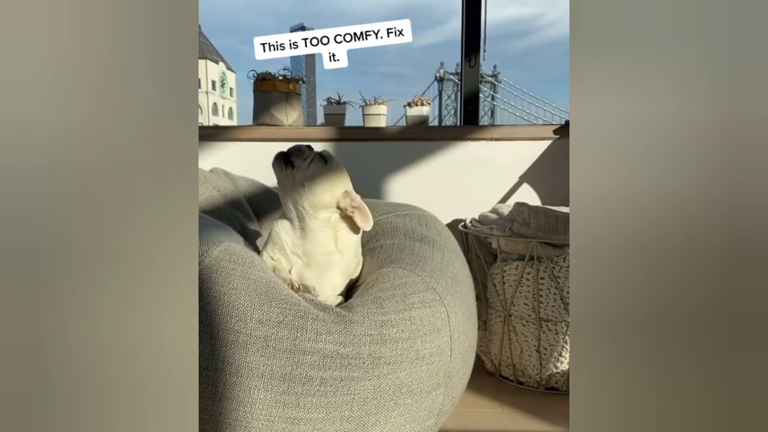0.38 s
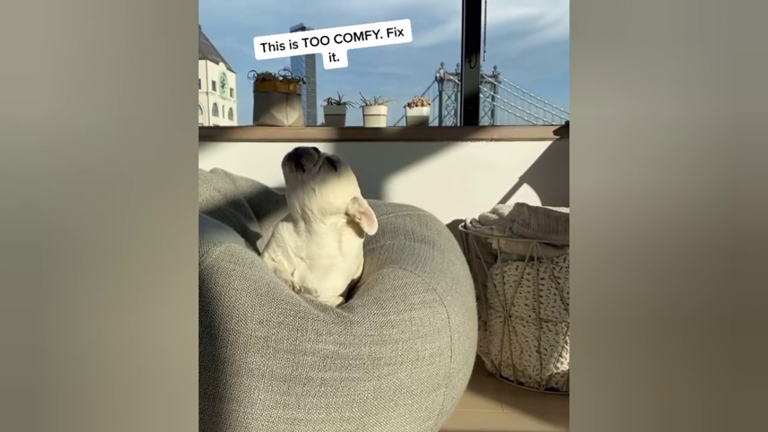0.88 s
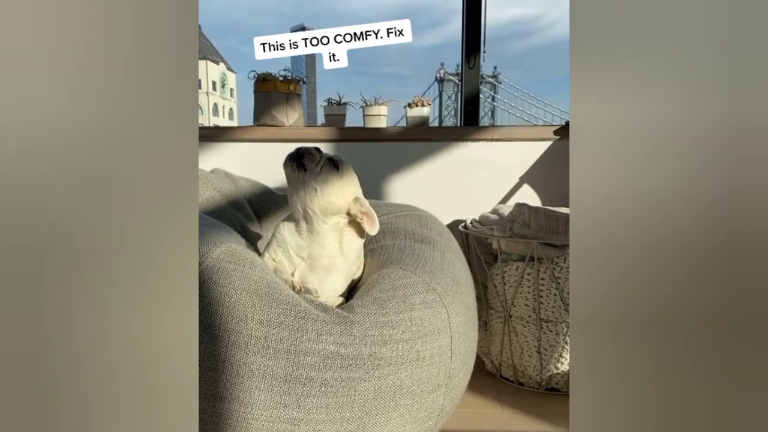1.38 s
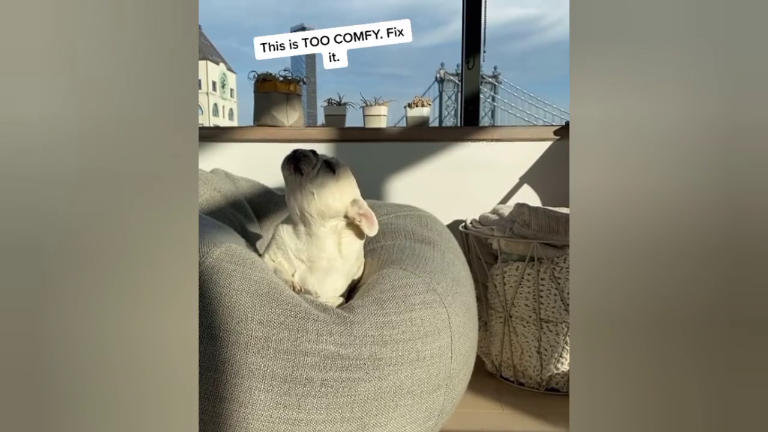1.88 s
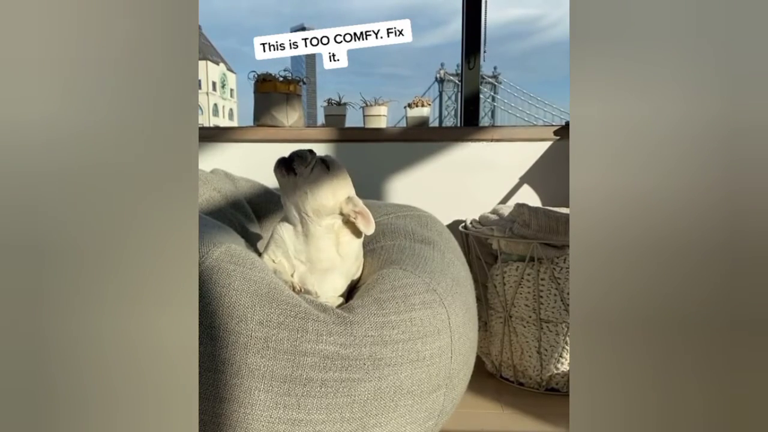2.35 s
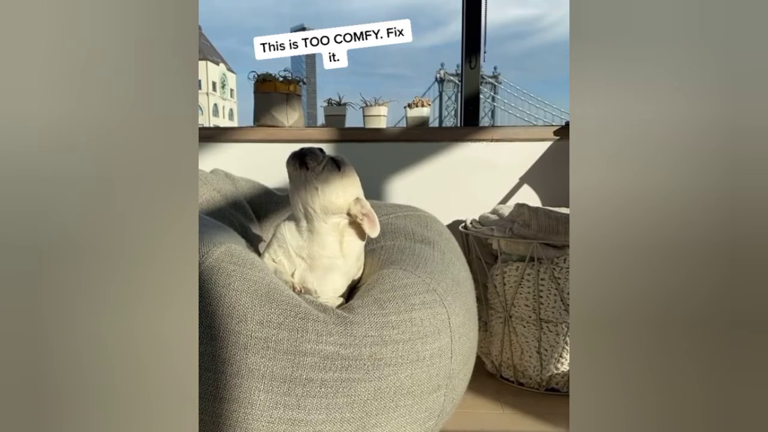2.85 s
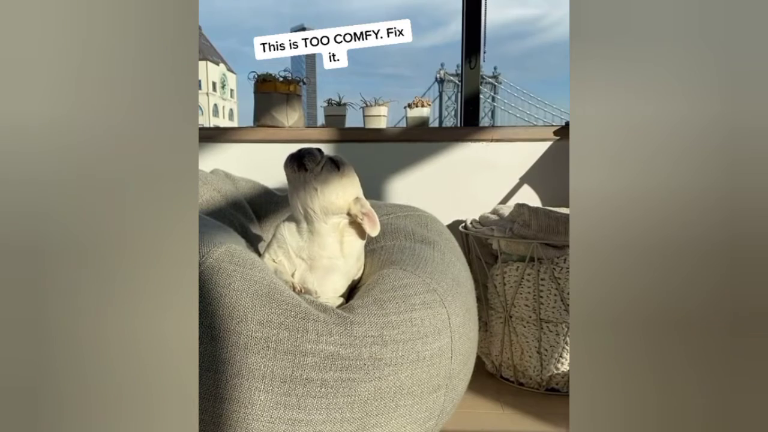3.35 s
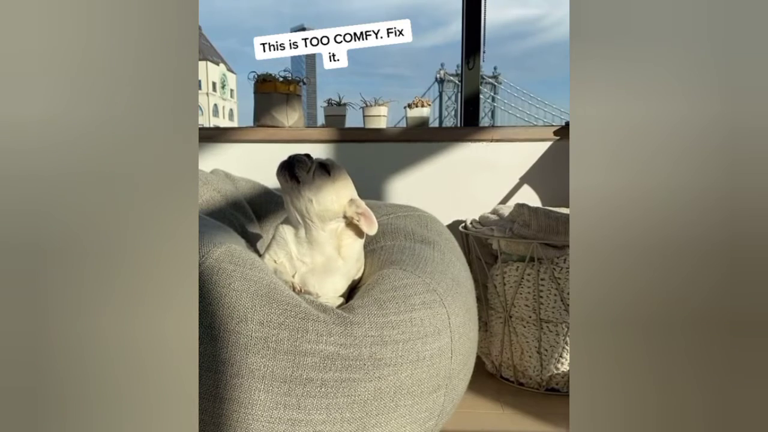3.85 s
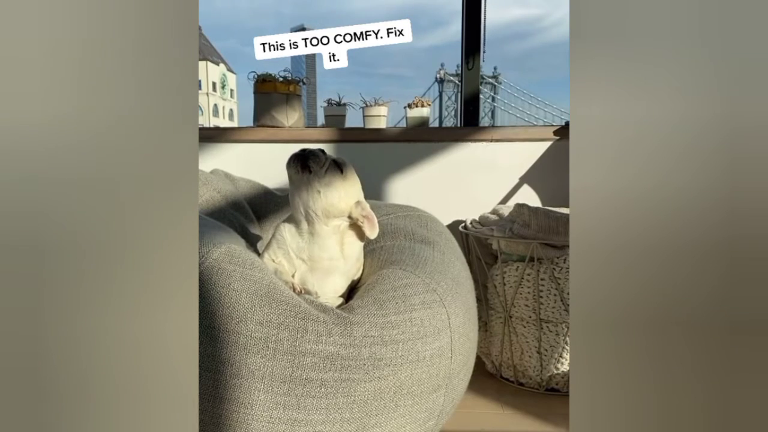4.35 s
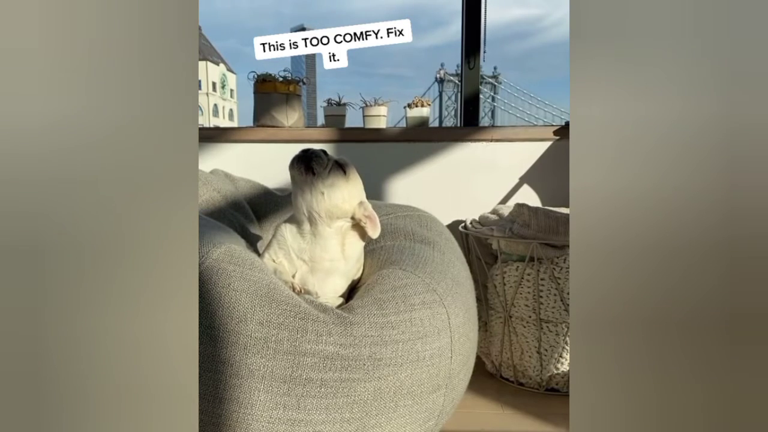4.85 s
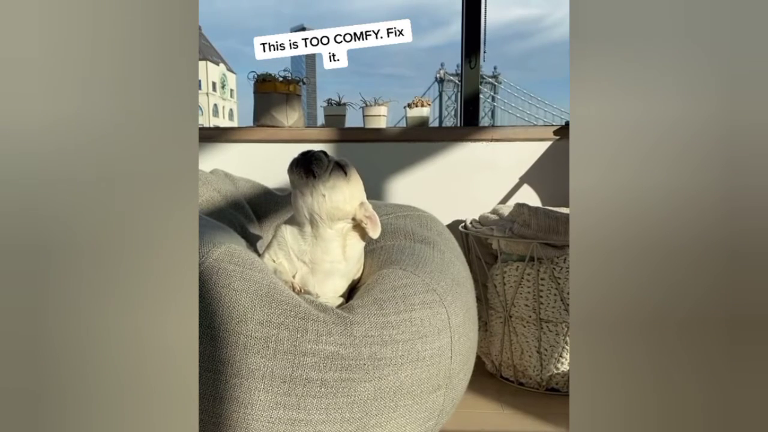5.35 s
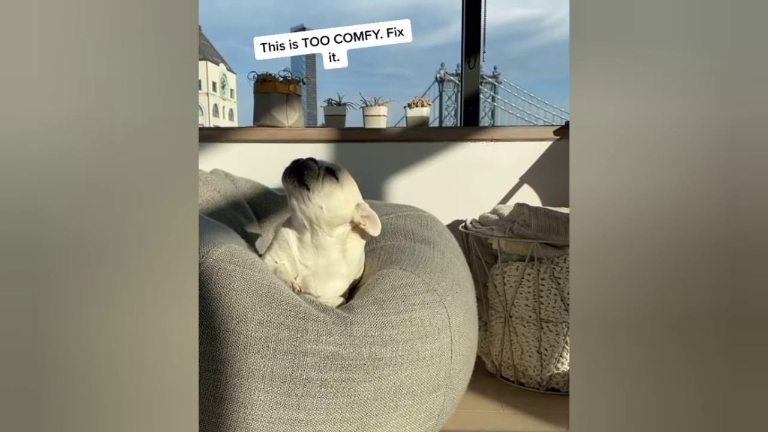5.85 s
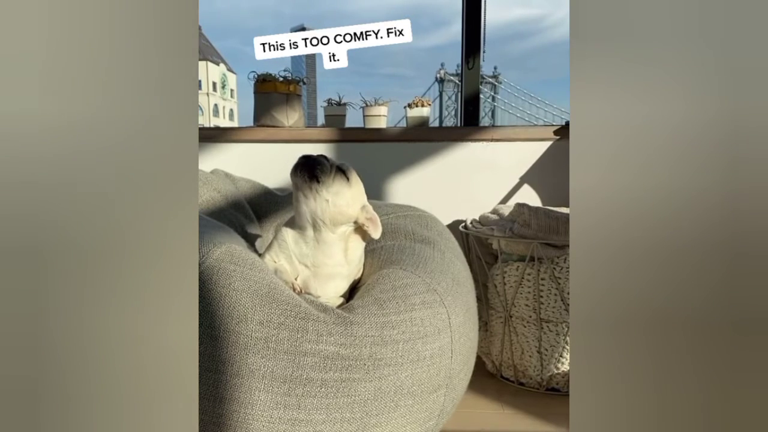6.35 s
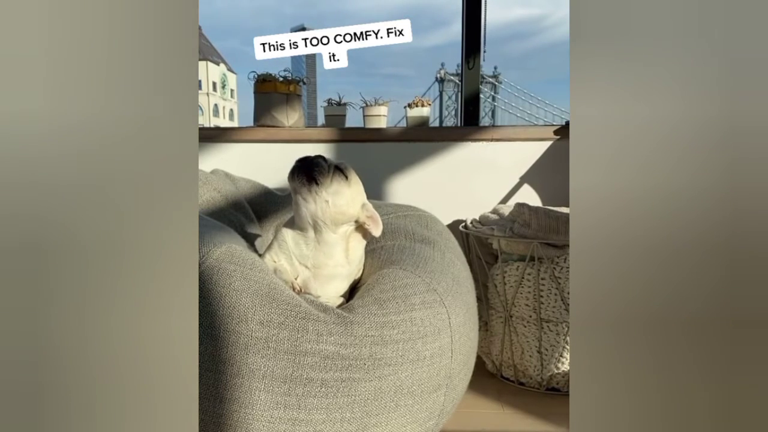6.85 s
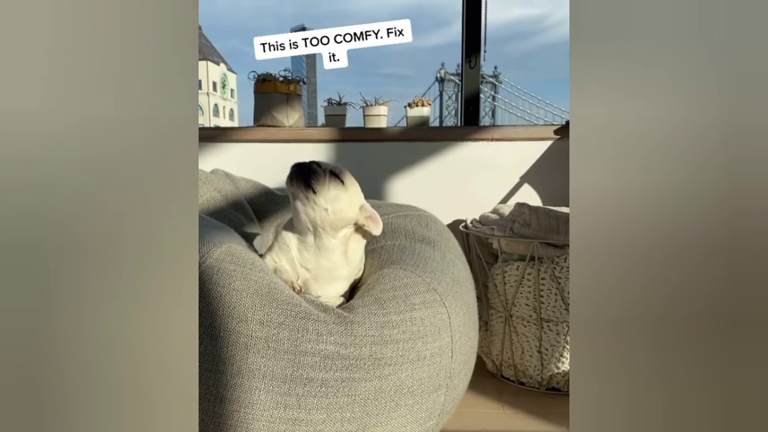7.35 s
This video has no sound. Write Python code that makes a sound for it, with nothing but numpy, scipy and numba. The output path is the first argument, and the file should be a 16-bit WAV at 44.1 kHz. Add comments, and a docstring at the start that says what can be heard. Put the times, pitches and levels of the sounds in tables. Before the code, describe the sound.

Four short nasal sniffs each lead to a sharp raspy bark and a drawn-out quavering dog howl, close indoors, over very quiet low hum.

```python
"""Indoors, a low city hum lies under the whole take, coming through the window with a faint mains tone.
Four times, a small flat-faced dog on a cushion sniffs in, barks, and lets the bark run into a wavering yowl.
The sniffs are noise through nostril resonances. In the howls a near-pure fold tone is fluttered by loose
throat tissue, and breath rasps through throat, mouth and short snout.
After each sound the furnished room leaves a short tail; a phone with two ports picks it all up in stereo."""
import sys
import numpy as np
from scipy import signal
from scipy.fft import rfft, irfft, next_fast_len
from scipy.io import wavfile
from scipy.ndimage import uniform_filter1d
from numba import njit

SR = 44100
rng = np.random.default_rng(int(sys.argv[2]) if len(sys.argv) > 2 else 0)


def inscribe(sig):
    """Save sig as 16-bit PCM at rate SR to the path in sys.argv[1].

    A 1-D sig is mono; a 2-D sig holds one channel per row.
    Samples are clipped to [-1, 1] before scaling.
    """
    pcm = np.round(np.clip(np.atleast_2d(sig).T, -1, 1) * 32767)
    wavfile.write(sys.argv[1], SR, pcm.astype(np.int16))


def natural_amplitude(level_db):
    """Convert a level in decibels to a linear amplitude factor, elementwise."""
    exponent = np.asarray(level_db, float) / 20
    return 10 ** exponent


N = 329427
T = np.arange(N) / SR  # seconds

# City hum through the window. Each row: frequency in Hz, relative density in dB per Hz.
HUM = [(18, -31), (30, -9.5), (71, -2.5), (186, -4), (307, -17.5), (624, -24), (1520, -33.5), (2140, -62.5),
       (2880, -39.5), (3220, -62), (3530, -41), (7000, -62), (9100, -95.5), (15400, -120)]
HUM_DB, MAINS_HZ = -58, 60
# Room tail in bands. Each row: centre in Hz, decay time in s, relative level in dB,
# share that differs between the ports.
ROOM = [(436, 0.31, -4.5, 0.19), (695, 0.62, -13, 0.15), (1610, 0.72, -8.5, 0.5), (3456, 0.25, -6, 0.74),
        (7400, 0.12, -9.5, 0.68)]
# How the two microphone ports hear the dog. Each row: frequency in Hz, left minus right in dB,
# lead of the left in radians.
PORTS = [(100, 0, 0), (360, -.5, 0), (520, -6, 0), (920, -6, 0), (1200, 1, 0), (1800, .5, .1),
         (2600, .5, .7), (4200, -1, 1.2), (6200, 0, 2), (7700, 0, 3), (9500, 0, 2.9), (12000, 0, 2.2)]

# Breaths drawn in through the nose. Each row: start in s, end in s, level in dB.
SNIFFS = [(0, 0.24, -66), (2.094, 2.257, -66.5), (3.813, 3.991, -66), (5.782, 5.99, -65.5)]
# Resonances of the nostrils in a sniff. Each row: centre in Hz, width in Hz, relative level in dB.
NOSTRILS = [(834, 160, -4), (1330, 1100, -1.5), (2700, 200, -15.5), (5200, 1200, -11.5), (6960, 870, -9.5)]
# Snout resonances above the mouth's own. Each row: centre in Hz, width in Hz, relative level in dB.
SNOUT = [(2830, 400, -7.5), (3600, 950, 2), (3980, 230, 3), (4400, 210, 2)]
# Resonances of the nose. Each row: centre in Hz, width in Hz, relative level in dB.
NOSE = [(5720, 710, -4), (6410, 300, -4.5), (7004, 1000, -1), (7580, 450, -8), (11430, 870, -22),
        (12900, 600, -16)]

# The bark that opens each howl. Each row: breath burst in s, delay until the folds catch in s,
# hold from the catch in s, level in dB, extra breath in dB.
BARKS = [(0.226, .03, 0.11, -12, 0.5), (2.268, .034, .075, -11, 3), (3.996, .028, 0.096, -12, 2),
         (5.985, 0.03, 0.076, -13, -1)]
# Bark pitch as a share of the top pitch: at the burst, at full voice, at the end of the hold, after release.
BARK_PITCH = (.92, .97, 0.91, 0.82)
# Breath in dB at the same four moments, before the extra breath.
BARK_BREATH_DB = (33.4, 23, 13, 35)
# Mouth resonance in Hz at the same four moments.
BARK_MOUTH_HZ = (2540, 2570, 2414, 2100)
BARK_TOP_HZ = 859
BARK_BURST_S, BARK_ATTACK_S, BARK_RELEASE_S = 0.0056, 0.012, .075
# level steps: at the burst, at the end of the hold, after the release
BARK_LEAD_DB, BARK_SAG_DB, BARK_END_DB = -28.5, -8, -28.5

# The yowl after each bark, one list a howl. Each row: time in s, fold pitch in Hz, level in dB,
# breath in dB, mouth resonance in Hz.
YOWLS = [
    [(.48, 720.4, -35.5, 25, 1957), (.544, 694, -22.5, 5.5, 2010), (.63, 656.3, -32, 1, 1940),
     (.68, 554, -36, 1, 1828), (.81, 513.3, -35.5, -5, 1920), (1.05, 505.2, -33.5, -4, 1950),
     (1.21, 452, -38.5, -9.5, 1896), (1.32, 457.8, -54.5, 12, 1960), (1.38, 440.1, -50, 1, 1950),
     (1.46, 403.6, -49.5, -13, 2010), (1.5, 399.6, -46.5, -14, 2030), (1.555, 434.3, -47, 3, 2027),
     (1.572, 512, -33, 0.5, 1977), (1.618, 620.4, -29, 4, 2000), (1.7, 500.4, -40, -6.5, 2010),
     (1.8, 411, -53.5, -5.5, 2020)],
    [(2.5, 760, -27, 1.5, 2035), (2.59, 813, -19, 16, 2170), (2.625, 790, -16, 0, 2164),
     (2.76, 658, -32, 0, 2100), (2.845, 575, -29.5, -1.5, 1961), (2.95, 570, -32.5, -1.5, 1990),
     (3.04, 600, -28, 1, 2095), (3.126, 520, -34, -8, 2010), (3.25, 535, -32.5, -1.5, 1995),
     (3.326, 574, -27, 2.5, 2017), (3.43, 480, -38.5, -6.5, 1921), (3.47, 487.8, -53.5, 8, 1930)],
    [(4.25, 787.5, -30, 16.5, 1990), (4.316, 765, -18, -1.5, 2050), (4.38, 722, -17.5, 2, 2170),
     (4.5, 645, -27.5, -10.5, 2000), (4.606, 586, -29.5, -0.5, 1851), (4.712, 555, -29.5, -2.5, 2000),
     (4.8, 613.1, -27, -5.5, 2000), (4.86, 635, -23, 2.5, 2050), (5, 697.6, -20.5, 1, 2103),
     (5.09, 621, -29, 2.5, 2117), (5.17, 606.4, -31, 8, 2030), (5.244, 693.7, -19, 6, 2150),
     (5.29, 711.3, -16.5, 5, 2230), (5.366, 512.7, -40.5, 10, 2150), (5.44, 482.3, -54, 14.5, 2150)],
    [(6.24, 688, -31.5, 16, 2033), (6.31, 678, -21, 13.5, 2100), (6.43, 665, -23.5, 12.5, 2053),
     (6.49, 676, -22.5, 12.5, 2100), (6.57, 742, -12, 8, 2260), (6.65, 731.8, -19, 7.5, 2354),
     (6.71, 742, -19.5, 17, 2454), (6.76, 717.4, -15, 10, 2250), (6.85, 694, -25.5, 15, 2160),
     (6.92, 674, -22.5, 7, 2140), (7, 613, -35.5, 21, 2175), (7.1, 506.6, -34.5, 6.5, 2138),
     (7.2, 357.5, -48.5, 8, 2052), (7.24, 366.8, -49.5, -10, 2100)],
]
# How each yowl shares its rasp. Each row: throat in dB, low in dB, mouth in dB, nose in dB.
SHARES = [(7, 0.5, 1.5, -4), (3, -1, 1, 1), (-3, -1, -0.5, 6.5), (-6.5, -1, -3.5, 1.5)]
# The loose throat tissue. Each row: time in s, mean flutter rate in Hz, flutter depth before its raggedness.
FLUTTER = [(.25, 88.23, 0.52), (0.449, 84.2, 0.7), (.55, 86.95, 0.28), (.68, 93.77, .35),
           (1.049, 107.9, 0.44), (1.5, 101.4, .4), (1.62, 94.2, 0.64), (2.301, 97.25, 0.81),
           (2.5, 107.8, 0.85), (2.629, 107.9, 0.29), (2.848, 105.5, 0.76), (3.05, 109.2, 0.83),
           (3.148, 106.1, 0.81), (3.33, 109, 0.9), (4.019, 84.91, .5), (4.249, 86.66, 0.26),
           (4.378, 103.9, 0.53), (4.6, 90.15, 0.29), (4.72, 82, .45), (4.86, 81.98, .5), (4.998, 75, 0.89),
           (5.099, 76.32, 1.3), (5.198, 76.78, 0.37), (5.28, 75.62, 0.7), (6.022, 85.3, .45),
           (6.24, 72.66, 0.28), (6.308, 73.43, 0.61), (6.451, 72.68, 0.56), (6.548, 80.3, 0.47),
           (6.698, 81.06, .95), (6.781, 74.15, 0.8), (6.902, 70.7, 0.2), (6.999, 69.3, 1.2),
           (7.201, 58.95, 0.4)]
# Rough strands an octave up as the voice falls away. Each row: start in s, end in s, dB relative to the voice.
BREAKS = [(1.6, 1.74, -24), (5.29, 5.4, -22), (6.96, 7.13, -11)]

# rasp of each hollow relative to the voice: (dB at breath 0, dB per dB of breath)
THROAT_RASP, LOW_RASP, MOUTH_RASP = (-18, 0.033), (-32.5, 0.71), (-28, .55)
SNOUT_RASP, NOSE_RASP, BURST_RASP = (-39.5, 0.78), (-30.5, 0.8), (-32.5, 0.66)
BURST_HZ, BURST_WIDTH_HZ = 2000, 1100  # the torn burst of a bark
BARK_MOUTH_DB, BARK_SNOUT_DB, BARK_NOSE_DB = 1, 0.5, -2.5  # how a bark shifts the rasps
BARK_LOW_HZ, BARK_MOUTH_WIDTH_HZ = 1296, 300  # the open jaw of a bark
# the low rasp swells while the pitch drops: dB for each kHz per second, at most this much
FALL_RASP_DB, FALL_RASP_TOP_DB = 5.5, 7
# a weak yowl flutters raggedly: steadiest near the first level, fully ragged this many dB below
EVEN_DB, RAGGED_SPAN_DB = -17, 21
BARK_HOARSE, BARK_RAGGED, YOWL_HOARSE = .45, .7, .085  # shares
OVERTONE_DB, BARK_OVERTONE_DB = -35.5, -42  # relative to the voice
# folds below this pitch go slack, over this span, and their overtones hold a level of their own
SLACK_HZ, SLACK_SPAN_HZ, SLACK_OVERTONE_DB = 480, 31.5, -54.5
# the throat favours side tones near its own ring
RING_HZ, RING_WIDTH_HZ, RING_DB = 860.3, 150, -2.4
THROAT_TOP_HZ = 960
WAVER, PATCHY_DB = .009, 2.6  # spread of the slow pitch waver as a share, of the patches in a yowl's rasp


def unit(x):
    """Scale to rms 1."""
    return x / np.sqrt(np.mean(x ** 2))


@njit
def svf(x, hz, width):
    """State-variable band-pass with a moving centre, gain 1 there."""
    y, b, l = np.empty(len(x)), 0., 0.
    for i in range(len(x)):
        g, k = np.tan(np.pi * hz[i] / SR), width / hz[i]
        v = (b + g * (x[i] - l)) / (1 + g * (g + k))
        b, l, y[i] = 2 * v - b, l + 2 * g * v, k * v
    return y


def resonance(x, hz, width):
    """A steep resonance: the band-pass twice."""
    hz = np.clip(hz + np.zeros(len(x)), 20, .45 * SR)
    return svf(svf(x, hz, 1. * width), hz, 1. * width)


def walk(rate):
    """Smooth chance that changes about rate times a second; spread 1."""
    k = int(SR / rate)
    return unit(uniform_filter1d(uniform_filter1d(rng.standard_normal(N), k), k))


def shaped(x, table, gain):
    """Filter by a gain computed from columns laid on a log-frequency axis."""
    hz, *columns = np.transpose(table)
    size = next_fast_len(x.shape[-1])
    axis = np.log(np.arange(size // 2 + 1) * SR / size + 1)
    columns = [np.interp(axis, np.log(hz), c) for c in columns]
    return irfft(rfft(x, size) * gain(*columns), size)[..., :x.shape[-1]]


def hum():
    """Distant traffic and house machinery as shaped noise, nearly the same at both ports, and a mains tone."""
    shared, apart = shaped(rng.standard_normal((2, N)), HUM, lambda db: natural_amplitude(db))
    apart = resonance(apart, 2500, 1800)
    noise = unit(shared + .8 * apart * np.array([[1], [-1]]))
    mains = natural_amplitude(-61) * np.sin(2 * np.pi * MAINS_HZ * T)
    return natural_amplitude(HUM_DB) * natural_amplitude(1.0 * walk(0.81)) * noise + mains


def room(x):
    """Diffuse tail of decaying noise bands, the top dying soonest; the ports differ most in the treble."""
    t = T[:SR // 2]
    rise = 1 - np.exp(-t / 0.0034)
    tail = 0
    for hz, t60, db, spread in ROOM:
        shared, apart = (unit(resonance(rng.standard_normal(len(t)), hz, hz)) for _ in range(2))
        fade = rise * np.exp(-np.log(1000) * t / t60)
        level = natural_amplitude(db) / np.sqrt(np.sum(fade ** 2)) * np.sqrt(hz / SR * 2)
        tail = tail + level * fade * (shared + spread * apart * np.array([[1], [-1]]))
    return signal.fftconvolve(x[None], tail, axes=1)[:, :N]


def sniffs():
    """Air hissing in through narrow nostrils, swelling and fading before each call."""
    shape = 0
    for start, end, db in SNIFFS:
        progress = np.clip((T - start) / (end - start), 0, 1)
        shape = shape + natural_amplitude(db) * np.sin(np.pi * progress ** 1.2)
    air = rng.standard_normal(N)
    return shape * unit(sum(natural_amplitude(db) * resonance(air, hz, width) for hz, width, db in NOSTRILS))


def cavities(air, table):
    """Air through fixed hollows, each band of rasp swelling and fading at random, on its own."""
    drift_db, drift_rate = 4.5, 10
    return unit(sum(natural_amplitude(db + drift_db * walk(drift_rate)) * resonance(air, hz, width)
                    for hz, width, db in table))


def bark(start, lead, hold, db, extra_db):
    """Rows like a yowl's: breath first, the folds catch, pitch peaks in the hold, the mouth closes."""
    catch = start + lead
    end = catch + hold
    s = [start - BARK_BURST_S, start, catch, catch + BARK_ATTACK_S, catch + hold / 2, end, end + BARK_RELEASE_S]
    stage = [0, 0, .5, 1, 1.5, 2, 3]  # place among the four moments of the bark tables
    pitch, breath, mouth = (np.interp(stage, range(4), c) for c in (BARK_PITCH, BARK_BREATH_DB, BARK_MOUTH_HZ))
    pitch[4] = 1
    level = db + np.array([2 * BARK_LEAD_DB, BARK_LEAD_DB, BARK_LEAD_DB / 2 + 2, 0, 0, BARK_SAG_DB, BARK_END_DB])
    breath = breath + extra_db * (np.array(stage) < 3)
    return np.transpose([s, BARK_TOP_HZ * pitch, level, breath, mouth])


def controls():
    """The dog's effort over time: pitch, level, breath, mouth, the four shares, barking 0-1, sounding 0-1."""
    rows, sounding = [], 0
    for bark_row, yowl, shares in zip(BARKS, YOWLS, SHARES):
        howl = np.concatenate([bark(*bark_row), yowl])
        s = howl[:, 0]
        barking = s < yowl[0][0]
        rows.append(np.column_stack([howl, np.outer(~barking, shares), barking]))
        sounding = sounding + np.clip(np.minimum(T - s[0], s[-1] - T) / .02 + .5, 0, 1)
    s, *columns = np.concatenate(rows).T
    return [uniform_filter1d(np.interp(T, s, c), size=SR // 150) for c in columns] + [sounding]


def dog():
    """Fold tone with fluttering loudness and pitch, its overtones, and breath let through at each flutter."""
    hz, db, breath_db, mouth_hz, *shares, barking, sounding = controls()
    yowling = 1 - barking
    s, *columns = np.transpose(FLUTTER)
    rate, depth = (np.interp(T, s, c) for c in columns)

    # more breath, more rasp; it comes and goes in patches
    throat_db, low_db, mouth_db, snout_db, nose_db = (
        base + slope * breath_db for base, slope in (THROAT_RASP, LOW_RASP, MOUTH_RASP, SNOUT_RASP, NOSE_RASP))
    throat_db, low_db, mouth_db, nose_db = (
        rasp + share + PATCHY_DB * (1 - barking / 2) * walk(14)
        for rasp, share in zip((throat_db, low_db, mouth_db, nose_db), shares))
    mouth_db = mouth_db + BARK_MOUTH_DB * barking
    nose_db = nose_db + BARK_NOSE_DB * barking
    snout_db = snout_db + BARK_SNOUT_DB * barking

    falling = -uniform_filter1d(np.gradient(hz), size=SR // 20) * SR / 1000  # kHz per second
    # low folds are slack unless the pitch is dropping fast
    slack = np.clip((SLACK_HZ - hz) / SLACK_SPAN_HZ, 0, 1) * np.clip(2 - 2.5 * falling, 0, 1)
    overtone_db = db + OVERTONE_DB * yowling + BARK_OVERTONE_DB * barking
    overtone_db = overtone_db * (1 - slack) + SLACK_OVERTONE_DB * slack
    low_db = low_db + np.clip(FALL_RASP_DB * falling, 0, FALL_RASP_TOP_DB) * yowling
    throat_db, low_db = throat_db - 2.4 * slack, low_db - 12.0 * slack
    hoarse = BARK_HOARSE * barking + YOWL_HOARSE * yowling * (1 - .7 * slack)
    ragged = BARK_RAGGED * barking + np.clip((EVEN_DB - db) / RAGGED_SPAN_DB, .2, 1) * yowling

    flutter = 2 * np.pi * np.cumsum(rate * (1 + .5 * ragged * walk(50))) / SR
    depth = np.clip(depth * natural_amplitude(4.0 * ragged * walk(45)), 0, 1.6 - .9 * barking)
    # loudness and pitch rise together in each flutter, so the side tones lie above the fold pitch
    swell = np.exp(depth * np.cos(flutter)) / np.sqrt(np.i0(2 * depth))
    swell = swell * natural_amplitude(5.8 * hoarse * walk(60))
    slip = depth * np.sin(flutter)
    folds = 2 * np.pi * np.cumsum(hz * (1 + .08 * hoarse * walk(120) + WAVER * walk(18))) / SR
    tone = np.sqrt(2) * svf(swell * np.cos(folds + slip), hz + 90, 550.)
    tone = tone + natural_amplitude(RING_DB) * resonance(tone, RING_HZ, RING_WIDTH_HZ)

    # the evener the flutter, the more it takes hold of the overtones (second to fifth)
    grip = 1 - ragged
    partials = [natural_amplitude(-15.0 * np.sqrt(k) - 3 * k) * np.cos((k + 2) * (folds + .6 * grip * slip)) for k in range(4)]
    overtones = np.sqrt(2) * swell ** grip * sum(partials)
    overtones = overtones + natural_amplitude(10.5) * resonance(overtones, mouth_hz, 240)

    # the tissue slaps shut once a flutter; the hiss of breath follows the swell
    slaps = unit(np.diff(np.floor(flutter / (2 * np.pi)), prepend=0)) * depth
    breath = (.45 + .6 * swell) * rng.standard_normal((8, N)) + .55 * slaps
    throat = natural_amplitude(throat_db) * unit(resonance(breath[0], hz + 200, 720))
    chest = natural_amplitude(-38) * unit(resonance(breath[1], 320, 250))
    low_hz = (2 * hz + 60) * yowling + BARK_LOW_HZ * barking
    low = natural_amplitude(low_db) * unit(resonance(breath[2], low_hz, 560))
    yowl_mouth = unit(resonance(breath[3], mouth_hz, 210))
    bark_mouth = unit(resonance(breath[3], mouth_hz, BARK_MOUTH_WIDTH_HZ))
    mouth = natural_amplitude(mouth_db) * (yowling * yowl_mouth + barking * bark_mouth)
    high = natural_amplitude(snout_db) * cavities(breath[4], SNOUT) + natural_amplitude(nose_db) * cavities(breath[5], NOSE)

    breaking = sum(natural_amplitude(level) * np.clip(np.minimum(T - start, end - T) / .02, 0, 1)
                   for start, end, level in BREAKS)
    strand = breaking * unit(resonance(breath[6], 2 * hz, 130))
    burst_db = BURST_RASP[0] + BURST_RASP[1] * breath_db
    burst = barking * natural_amplitude(burst_db) * unit(resonance(breath[7], BURST_HZ, BURST_WIDTH_HZ))

    # the first throat resonance ends steeply just under a kilohertz
    throat_top = signal.butter(5, THROAT_TOP_HZ, fs=SR, output="sos")
    tone = signal.sosfilt(throat_top, tone + throat)
    voice = tone + chest + low + strand + burst + mouth + high
    return sounding * (natural_amplitude(db) * voice + natural_amplitude(overtone_db) * overtones)


def scene():
    """Dog and its room tail pass the phone's ports, over the hum."""
    voice = dog() + sniffs()
    heard = voice + room(voice)
    half = np.array([[.5], [-.5]])  # each port takes half of the difference
    return shaped(heard, PORTS, lambda db, lead: natural_amplitude(half * db) * np.exp(1j * half * lead)) + hum()


def low_pass(x):
    """Removes everything above the highest recorded frequency."""
    return signal.sosfilt(signal.butter(12, 13750, fs=SR, output="sos"), x)


def record(dry):
    """The phone rounds the loudest peaks and keeps its bass in the centre."""
    limit = .95
    left, right = limit * np.tanh(dry / limit)
    side = signal.sosfilt(signal.butter(4, 220, "high", fs=SR, output="sos"), left - right)
    mix = np.array([left + right + side, left + right - side]) / 2
    return low_pass(mix)


dry = scene()
out = record(dry)
inscribe(out)
```